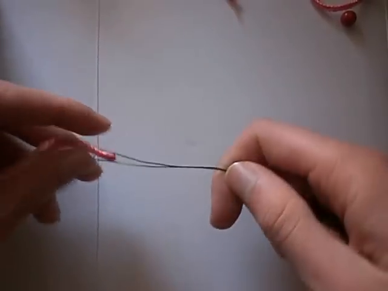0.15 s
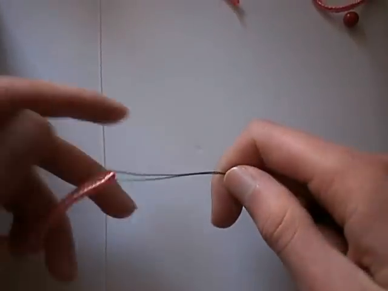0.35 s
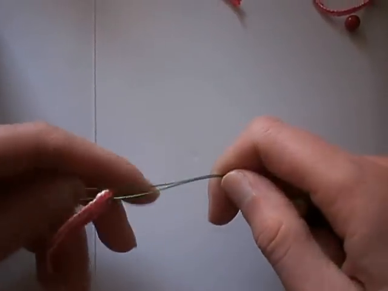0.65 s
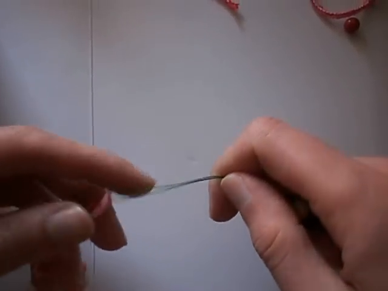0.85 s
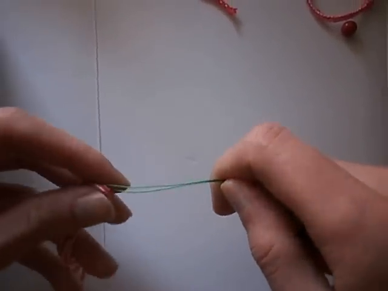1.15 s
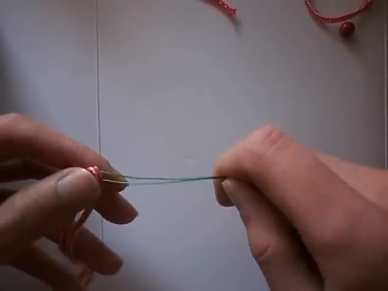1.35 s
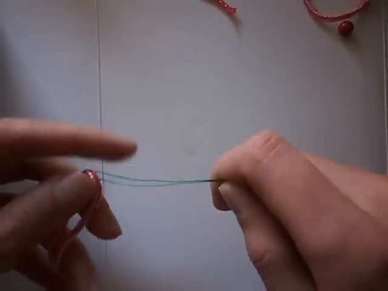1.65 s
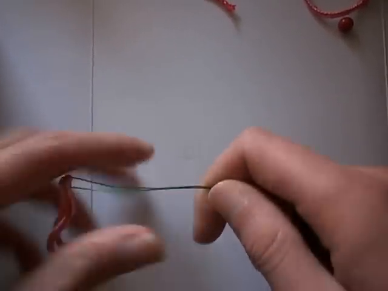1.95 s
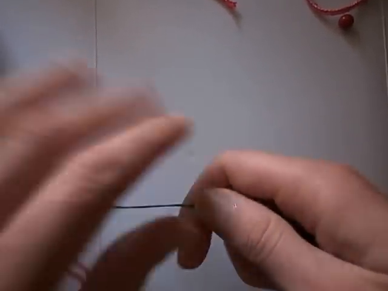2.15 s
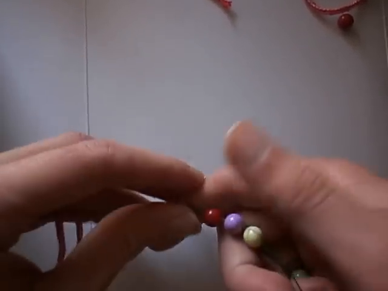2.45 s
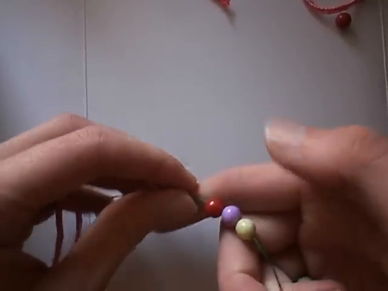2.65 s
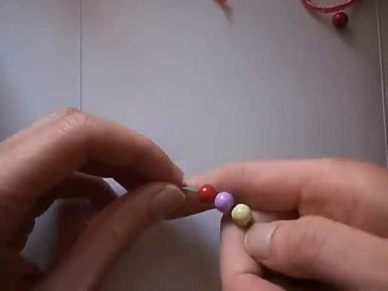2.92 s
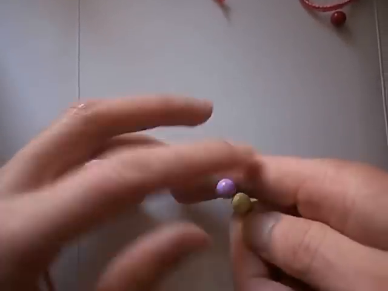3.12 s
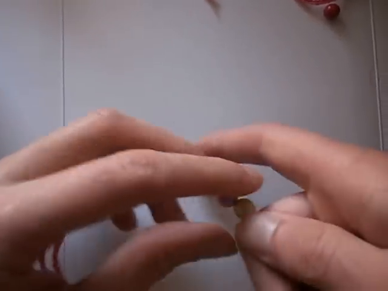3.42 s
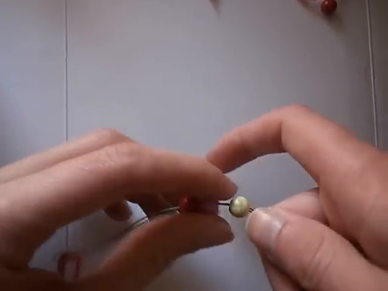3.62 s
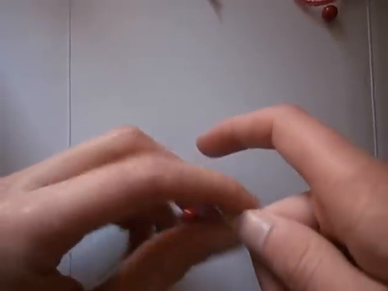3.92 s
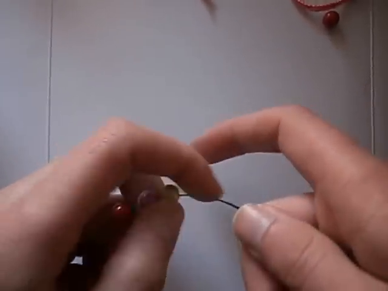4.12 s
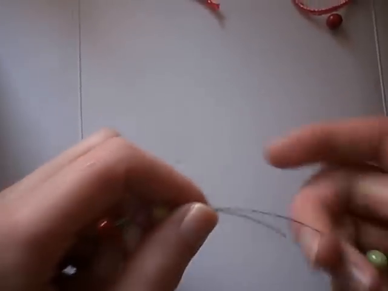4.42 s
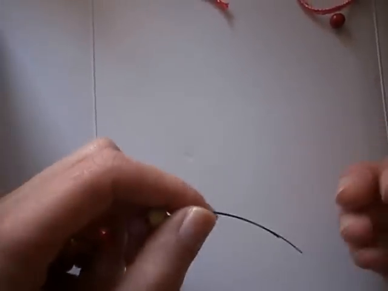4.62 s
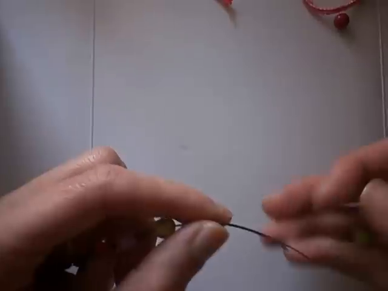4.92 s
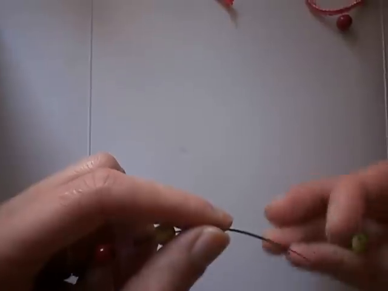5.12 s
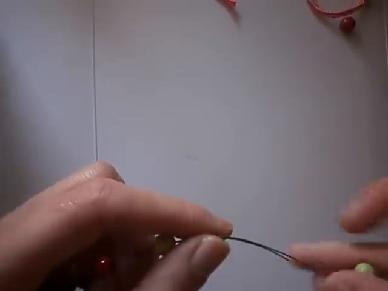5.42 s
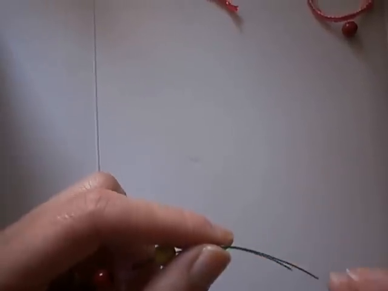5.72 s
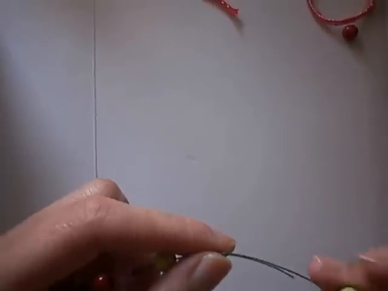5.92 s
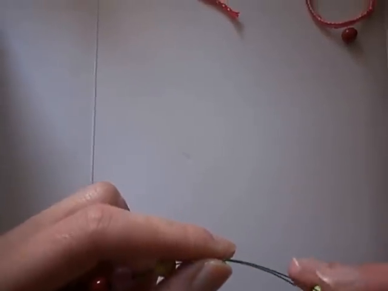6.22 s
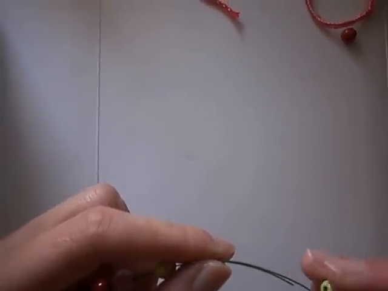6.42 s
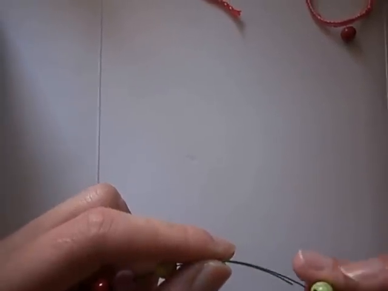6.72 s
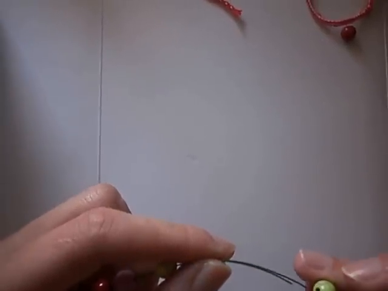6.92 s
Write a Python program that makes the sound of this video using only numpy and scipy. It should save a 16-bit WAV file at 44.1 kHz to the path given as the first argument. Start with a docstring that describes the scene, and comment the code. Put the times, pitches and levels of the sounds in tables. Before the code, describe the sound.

A computer fan hums steadily in a quiet room, with soft rushing air and a very faint high whine. Across the room a clock ticks faintly once a second, mostly as reverberation. Close to a small microphone, fingertips rub softly along a thin wire, and small plastic beads give a few light clicks in the first second. After a lull, brighter clicks come in little clusters from 2.3 to 2.9 seconds. Just after 3 seconds the wire chirps briefly in a bead hole. At 3.2 seconds a pinched bead snaps loose, the loudest sound, followed by a very short, shuddering rasp over the wire at 3.3 seconds. Scattered clicks and soft rubs continue until about 4.4 seconds, with a sharper click at 3.7. One last click comes at 5.5 seconds, then only the fan and clock remain until about 7 seconds.

```python
"""A computer fan hums and whines in a quiet room: steady tones over air rushing through its case.
Close to a small microphone, fingertips rub along a thin wire and plastic beads click on it, each
impact ringing their damped modes. Across the room a clock ticks once a second, mostly reverberation.
Friction makes the wire chirp in a bead hole; then a pinched bead snaps loose and rasps over the wire
by stick and slip."""
import sys
import numpy as np
from scipy import signal
from scipy.fft import rfft, irfft, next_fast_len
from scipy.io import wavfile
from scipy.ndimage import uniform_filter1d

SR = 44100
rng = np.random.default_rng(int(sys.argv[2]) if len(sys.argv) > 2 else 0)


def file_out(sig):
    """Save sig as 16-bit WAV at sys.argv[1]."""
    # one column per channel
    cols = np.atleast_2d(sig).T
    # limit, then scale
    lim = np.clip(cols, -1, 1)
    pcm = np.round(lim * 32767).astype(np.int16)
    wavfile.write(sys.argv[1], SR, pcm)


N = 311430
TIME = np.arange(N) / SR

# weaker fan and mains tones: f/Hz, rms level/dB, level waver/dB, pitch wander/Hz
FAN_TONES = [(120.7, -61.5, 0, .2), (209.8, -54, 0.5, 0.32), (427.7, -52.5, 1.5, .7),
             (1141.7, -58, 1.4, .4)]
# partials of the fan's whine: f/Hz, relative level/dB
WHINE_PARTIALS = [(4867, -10.5), (4986, -1), (5017, -11), (5103, -12), (5346, -12), (5464, -15.5)]
# envelope of the whine: t/s, gain/dB
WHINE_ENVELOPE = [(0.2, -59.5), (0.65, -63), (1.8, -58), (2.4, -59.5), (4.4, -60.5), (5.0, -63), (7.0, -64)]
# spectrum of rushing air and microphone hiss: f/Hz, relative level/dB
AIR_SPECTRUM = [(20, -34), (40, -26.5), (100, -12.5), (170, -4), (230, 1), (360, -4), (600, -5), (850, -10),
                (1400, -15), (2200, -16), (3500, -22.5), (5200, -20.5), (7000, -26), (9500, -33.5)]
# resonances of the fan's case: f/Hz, bandwidth/Hz, rms level/dB
FAN_CASE_MODES = [(197, 22, -58), (254.5, 22, -53), (319.5, 31.4, -55.5), (400.5, 13.5, -55),
                  (414.6, 19.5, -57)]
# fingertips on wire and cord, and the bead creeping along the wire just before the drag (3.232 s, 3.244 s):
# t/s, half-width/s, level/dB, f/Hz, bandwidth/Hz
WIRE_RUBS = [(0.065, 0.085, -57.5, 4240, 900), (0.37, 0.046, -58, 6160, 2100),
             (1.08, 0.14, -60, 6200, 2100), (2.34, 0.082, -60, 5700, 2100), (2.457, .03, -56, 2600, 1500),
             (2.964, 0.032, -54, 2280, 1300), (3.232, 0.049, -48, 1100, 1500),
             (3.244, 0.033, -48, 2600, 2100), (4.045, 0.035, -52.5, 2430, 2100),
             (4.04, 0.07, -56, 6060, 2600), (4.18, 0.067, -58, 6060, 2100),
             (4.395, 0.025, -55, 2400, 2100), (4.448, .012, -56, 3500, 2100),
             (5.127, 0.04, -59, 5500, 2100)]
# bead against bead or wire: t/s, relative bright peak level/dB, bright f/Hz, bright t60/s,
# relative level of the lower modes/dB, strongest lower mode f/Hz
BEAD_IMPACTS = [(0.175, -34.5, 5100, .002, -42, 2950), (0.4688, -49, 5400, .003, -47, 3020),
                (0.7522, -40, 5400, .003, -52, 3000), (0.767, -34.5, 5400, .002, -45, 3000),
                (2.309, -27, 6400, .004, -37.5, 2920), (2.370, -30, 6460, .003, -39, 2800),
                (2.375, -38, 6500, .003, -45, 2500), (2.6362, -30.5, 5300, .002, -40, 3100),
                (2.638, -25.5, 5650, 0.0034, -38.5, 3100), (2.641, -33, 6300, .003, -38.5, 2200),
                (2.698, -39, 5400, .003, -52, 3000), (2.8324, -27, 5300, 0.0013, -40, 3000),
                (2.851, -37, 5700, .003, -50, 3400), (3.111, -42, 5400, .002, -42, 2400),
                (3.1232, -36, 6200, .003, -41.5, 2300), (3.279, -42, 5400, .003, -30, 2300),
                (3.3045, -28, 6000, .002, -34, 3050), (3.3140, -29, 5400, .003, -33.5, 3000),
                (3.3173, -30, 5400, .003, -29, 2050), (3.3195, -23, 5970, .002, -30.5, 2900),
                (3.475, -25.5, 6800, .003, -44, 4300), (3.478, -30, 5750, .004, -50, 3600),
                (3.518, -31, 6690, .003, -49, 3000), (3.6237, -47, 5000, .003, -45, 2900),
                (3.6915, -34, 5440, .003, -44, 3600), (3.7178, -35, 5600, .004, -43, 3700),
                (3.7251, -20.5, 6670, .0035, -32.5, 3970), (3.8375, -37, 6500, .003, -47, 3600),
                (3.9517, -34, 6300, .003, -50, 3600), (4.024, -50, 5400, .003, -44, 2890),
                (4.155, -36, 5630, .003, -44, 3000), (4.3664, -33, 5430, 0.0033, -37.5, 2200),
                (5.4876, -28, 4750, .0035, -41, 2950), (5.488, -31, 5300, .004, -42, 3660)]
# gaps between the rebounds of one contact: t/s
REBOUND_GAPS = [.00012, .00021, .00035]
# bright and lower modes of a bead on the wire: f/Hz, relative level/dB, t60/s
BRIGHT_MODES = [(4320, -9.5, 0.0045), (5580, -7.5, 0.0055), (6500, -15, 0.0048), (9000, -16.5, .003)]
LOWER_MODES = [(2170, -16.5, 0.009), (3200, -9.5, 0.004), (3560, -6.5, 0.004), (4720, -3, 0.0052)]
# beats of the clock: t/s, gain/dB, rise/s, treble tilt/(dB/octave)
CLOCK_BEATS = [(.26, -40.5, 0.031, -1.5), (1.254, -36.5, .016, -.3), (2.25, -47, .02, 2),
               (3.252, -36.5, .012, -1), (4.251, -42, 0.015, -0.5), (5.249, -37.5, 0.0079, -2),
               (6.25, -44.5, 0.028, -4)]
# resonances of the clock's case: f/Hz, bandwidth/Hz, relative level/dB, t60 with the room's tail/s
CLOCK_MODES = [(1100, 1100, -11.5, 0.48), (1604, 220, -7.5, 0.44), (1976, 360, -10, 0.79),
               (2287, 280, -5.5, 0.42), (2900, 600, -9, 0.54), (3630, 900, -11, .36),
               (4600, 410, -9.5, 0.4), (5390, 620, -13.5, 0.42), (6960, 1300, -22.5, 0.77)]
# chirps of the wire in a bead hole: t/s, half-width/s, gain/dB
WIRE_CHIRPS = [(3.0515, .0025, -38), (3.058, 0.005, -42), (3.0655, 0.0059, -33.5), (3.077, 0.0054, -42),
               (3.0832, 0.0029, -29.5), (3.0872, 0.0025, -37), (3.505, .008, -46)]
# fine scratch around a chirp: f/Hz, bandwidth/Hz, relative level/dB
SCRATCH_BANDS = [(3000, 1200, -14.5), (4500, 600, -17), (6250, 2400, -13)]
# modes of bead and wire held in the fingers: f/Hz, relative level/dB, t60/s
GRIPPED_MODES = [(985, 3.5, 0.06), (1080, -0.5, 0.027), (1186, -1.5, 0.019), (1750, -10, 0.016),
                 (2180, -3, 0.014), (2290, 1.5, 0.012), (3140, 1.5, .012), (3500, -12, 0.0054),
                 (4450, -1.5, 0.01), (5400, -7, 0.016), (6500, -23, 0.0025)]
# the dragged bead catches and shudders: t/s, half-width/s, level/dB
DRAG_CATCHES = [(3.269, 0.012, -32.5), (3.283, .008, -29), (3.292, 0.0053, -23), (3.3058, .008, -24),
                (3.3145, 0.0055, -28.5)]
# hiss of plastic sliding on wire: f/Hz, bandwidth/Hz, level at the stop/dB, growth/(dB/s)
RASP_BANDS = [(2130, 450, -36.5, 75), (3070, 510, -39, 130), (3900, 700, -52, 100), (4570, 500, -45.5, 60),
              (5480, 500, -44, 130), (6560, 1200, -45, 310), (8700, 1200, -52, 300)]
# microphone response, with a deep treble notch: f/Hz, gain/dB
MICROPHONE_RESPONSE = [(6900, 0), (7450, -0.5), (7650, -11), (7880, -32), (8120, -29.5), (8350, -12.5),
                       (8600, -3.5), (9200, -10.5), (9600, -19), (10000, -24)]

DRAG_START_S, DRAG_STOP_S = 3.254, 3.320


def from_db(db):
    """Amplitude grows tenfold for every 20 dB."""
    return 10 ** (np.asarray(db) / 20)


def rms_one(x):
    """Normalisation to unit mean power."""
    return x / np.sqrt(np.mean(x ** 2) + 1e-20)


def evened(x, size):
    """Division by the running rms over size samples flattens the envelope."""
    return x / np.sqrt(np.abs(uniform_filter1d(x ** 2, size=size)) + 1e-6 * np.mean(x ** 2))


def add(out, s, sound):
    """Superposition: a sound joins the mix at time s."""
    at = max(0, round(s * SR))
    out[at:at + len(sound)] += sound[:N - at]


def filtered(x, order, hz, kind):
    """A maximally flat filter attenuates what lies outside its passband."""
    return signal.sosfilt(signal.butter(order, hz, kind, fs=SR, output="sos"), x)


def coloured(x, points):
    """Minimum-phase filtering by a (f/Hz, gain/dB) curve: nothing rings before a click."""
    hz, db = np.transpose(points)
    size = 2 * next_fast_len(len(x) // 2 + 1)
    bins = np.maximum(np.arange(size // 2 + 1) * SR / size, 1)
    gain = from_db(np.interp(np.log(bins), np.log(hz), db))
    cepstrum = irfft(np.log(gain))
    causal = np.r_[cepstrum[0], 2 * cepstrum[1:size // 2]]
    return irfft(rfft(x, size) * np.exp(rfft(causal, size)), size)[:len(x)]


def drift(corner_hz):
    """Low-passed noise gives a slow random fluctuation of unit rms."""
    step = 40
    pole = np.exp(-2 * np.pi * corner_hz * step / SR)
    noise = rng.standard_normal(N // step + 2002)
    slow = signal.lfilter([1], [1, -2 * pole, pole * pole], noise)[2000:]
    return np.interp(np.arange(N) / step, np.arange(len(slow)), rms_one(slow))


def resonant_noise(modes, size=N):
    """Resonators (f/Hz, bandwidth/Hz, rms level/dB) select steep-sided bands from white noise."""
    out = 0
    for hz, width, db in modes:
        r = np.exp(-np.pi * width / SR)
        section = [1, 0, -1, 1, -2 * r * np.cos(2 * np.pi * hz / SR), r * r]
        band = signal.sosfilt([section, section], rng.standard_normal(size))
        out = out + from_db(db) * rms_one(band)
    return out


def struck(modes):
    """An impulse response is a sum of damped modes (f/Hz, level/dB, t60/s)."""
    t = TIME[:SR // 20]
    return sum(from_db(db - 60 * t / t60) * np.sin(2 * np.pi * hz * t) for hz, db, t60 in modes)


def swells(rows):
    """Bell-shaped amplitude envelopes (t/s, half-width/s, level/dB), summed."""
    return sum(from_db(db) * np.exp(-np.minimum(2 * ((TIME - s) / half_width) ** 2, 20))
               for s, half_width, db in rows)


def tone(hz, wander_hz):
    """Random frequency modulation makes a sine of unit rms wander in pitch."""
    cycles = np.cumsum(hz + wander_hz * drift(4.0)) / SR
    return np.sqrt(2) * np.sin(2 * np.pi * (cycles + rng.random()))


def fan(hum_hz=249.5, hum_db=-37, hum_waver_db=1.0, air_db=-44.5):
    """Periodic motion gives a hum and a whine; rushing air gives noise and excites the case's modes."""
    hum = from_db(hum_db + hum_waver_db * drift(6)) * tone(hum_hz, wander_hz=0.51)
    tones = sum(from_db(db + waver_db * drift(8.9)) * tone(hz, wander_hz)
                for hz, db, waver_db, wander_hz in FAN_TONES)
    whine_gain = from_db(np.interp(TIME, *np.transpose(WHINE_ENVELOPE)))
    whine = whine_gain * sum(from_db(db) * tone(hz, wander_hz=2.0) for hz, db in WHINE_PARTIALS)
    air = from_db(air_db) * rms_one(coloured(rng.standard_normal(N), AIR_SPECTRUM))
    return hum + tones + whine + air + resonant_noise(FAN_CASE_MODES)


def wire_rubs(grain_db=3.5):
    """Sliding friction of fingertips, and of the bead creeping along the wire before the drag, gives soft
    swells of grainy band noise."""
    rubs = sum(swells([(s, half_width, db)]) * resonant_noise([(hz, width, 0)])
               for s, half_width, db, hz, width in WIRE_RUBS)
    return rubs * from_db(grain_db * drift(90))


def chatter(size, bounce=0.47, jitter=0.25, return_s=0.002, return_db=-10):
    """Elastic rebound breaks one contact into quick dying pulses, then a weaker second touch."""
    pulses = signal.unit_impulse(size)
    for gap_s in REBOUND_GAPS:
        lag = max(2, round(gap_s * SR * (1 + jitter * rng.uniform(-1, 1))))
        loop = np.r_[1, np.zeros(lag - 1), bounce]
        pulses = signal.lfilter(loop[::-1], loop, pulses)  # all-pass: the spectrum stays flat
    return_lag = round(return_s * SR * (1 + jitter * rng.uniform(-1, 1)))
    return pulses + from_db(return_db) * np.roll(pulses, return_lag)


def bead_clicks(lower_t60=0.005, settle_db=-31, settle_t60=0.054, bright_gain_db=1.5,
                lower_gain_db=-10.5):
    """Impact excitation: the contact force rings a bead's modes as it strikes, chatters and settles."""
    out, t = np.zeros(N), TIME[:SR // 40]
    for s, bright_db, bright_hz, bright_t60, lower_db, lower_hz in BEAD_IMPACTS:
        contact = chatter(len(t))
        contact += from_db(settle_db - 60 * t / settle_t60) * rng.standard_normal(len(t))
        # a free bead is too small to radiate much below its lower modes
        contact = filtered(contact, 3, 0.67 * lower_hz, "high")
        bright_ring = np.diff(struck([(bright_hz, 0, bright_t60)]) + struck(BRIGHT_MODES))
        lower_ring = struck([(lower_hz, 0, lower_t60)]) + struck(LOWER_MODES)
        bright = signal.fftconvolve(contact, bright_ring)
        lower = signal.fftconvolve(contact, lower_ring)[:len(t)]
        add(out, s, from_db(bright_db + bright_gain_db) * bright / np.abs(bright).max())
        add(out, s, from_db(lower_db + lower_gain_db) * rms_one(lower))
    return out


def clock(ring_hz=2220, ring_width_hz=450, ring_db=2, ring_t60=0.1,
          early_db=-7, early_t60=0.042, pivot_hz=2300):
    """Reverberation: the far escapement's brief ring and early reflections give way to a diffuse tail."""
    out, t = np.zeros(N), TIME[:SR // 2]
    early_boost = 1 + from_db(early_db - 60 * t / early_t60)
    for s, db, rise_s, tilt_db in CLOCK_BEATS:
        tail = 0
        for hz, width, mode_db, t60 in CLOCK_MODES:
            tilted_db = mode_db + tilt_db * max(0, np.log2(hz / pivot_hz))
            tail += resonant_noise([(hz, width, tilted_db)], size=len(t)) * from_db(-60 * t / t60)
        ring = evened(resonant_noise([(ring_hz, ring_width_hz, 0)]), size=200)[:len(t)]
        ring *= from_db(ring_db - 60 * t / ring_t60)
        rise = np.minimum(t / rise_s, 1)
        add(out, s, from_db(db) * (tail * early_boost + ring) * rise)
    return out


def wire_chirps(squeak_hz=2260, width_hz=550, squeak_db=-1):
    """Friction in a bead hole briefly excites a resonance: a squeak with fine scratch around it."""
    squeak = from_db(squeak_db) * evened(resonant_noise([(squeak_hz, width_hz, 0)]), size=120)
    return swells(WIRE_CHIRPS) * (squeak + resonant_noise(SCRATCH_BANDS))


def bead_snap(s=3.1947, peak_db=-7.5, pinch_pitch=1.08, pinch_t60=0.017, contact_hz=6000,
              rebound_s=0.00063, rebound_gain=0.73, cushion_hz=1800):
    """Sudden release rings a pinched bead, which strikes again at once; the fingers damp its modes."""
    out = np.zeros(N)
    modes = [(hz * pinch_pitch if hz < 1500 else hz, db, t60) for hz, db, t60 in GRIPPED_MODES]
    ring = filtered(struck(modes), 2, contact_hz, "low")
    ring *= from_db(-60 * TIME[:len(ring)] / pinch_t60)
    add(out, s, ring)
    # the second touch is cushioned by the fingertip
    add(out, s + rebound_s, rebound_gain * filtered(ring, 1, cushion_hz, "low"))
    return from_db(peak_db) * out / np.abs(out).max()


def push(stop_db, db_per_s, attack_s=0.013, release_t60=0.018):
    """Friction noise grows with speed: its envelope climbs until the bead stops, then dies quickly."""
    attack = np.clip((TIME - DRAG_START_S) / attack_s, 0, 1)
    until_stop = np.clip(DRAG_STOP_S - TIME, 0, 1)
    since_stop = np.clip(TIME - DRAG_STOP_S, 0, 0.5)
    return attack * from_db(stop_db - db_per_s * until_stop - 60 * since_stop / release_t60)


def bead_drag(slips_per_s=2500, spread_db=5, body_band_hz=(900, 1400), pitch_ratios=(1.03, 0.94)):
    """Stick-slip friction shakes the gripped bead at each catch, while its sliding hiss brightens."""
    slipping = rng.random(N) < slips_per_s / SR
    slips = slipping * from_db(spread_db * rng.standard_normal(N)) * rng.choice([-1, 1], N)
    body = signal.fftconvolve(slips, struck(GRIPPED_MODES))[:N]
    body = filtered(body, 1, body_band_hz, "band")
    # the ring sinks as the grip loosens
    pitch = np.interp(TIME, [DRAG_START_S, DRAG_STOP_S], pitch_ratios, left=1)
    body = np.interp(np.cumsum(pitch) / SR, TIME, body)
    # each band of sliding hiss is evened to a steady level, then follows the push
    hiss = sum(evened(resonant_noise([(hz, width, 0)]), size=400) * push(db, growth)
               for hz, width, db, growth in RASP_BANDS)
    return evened(body, size=200) * swells(DRAG_CATCHES) + hiss


def room(x, t60=0.25, table_delay_s=0.003):
    """A diffuse field decays exponentially, starting with the reflection from the table."""
    t = TIME[:SR // 2]
    tail = rng.standard_normal(len(t)) * from_db(-60 * t / t60) * (t > table_delay_s)
    return signal.fftconvolve(x, tail / np.linalg.norm(tail))[:N]


def scene(radiation_hz=660, room_db=-19):
    """Superposition of close handling sounds, their faint reverberation, the clock and the fan."""
    handling = bead_clicks() + bead_snap() + bead_drag() + wire_chirps() + wire_rubs()
    handling = filtered(handling, 6, radiation_hz, "high")  # such small things radiate no bass
    return (handling + from_db(room_db) * room(handling) + clock() + fan())[None]


def record(dry, cutoff_hz=9900):
    """The microphone's frequency response notches the treble; a steep low-pass cuts the top."""
    sound = coloured(dry[0], MICROPHONE_RESPONSE)
    low_pass = signal.ellip(8, 0.2, 70, cutoff_hz, fs=SR, output="sos")
    return signal.sosfilt(low_pass, sound)[None]


dry = scene()
out = record(dry)
file_out(out)
```